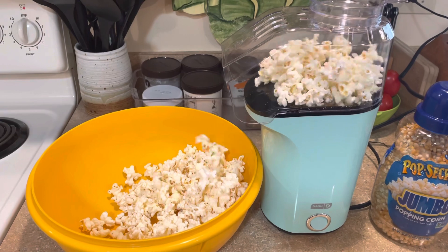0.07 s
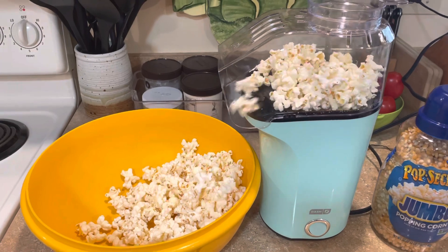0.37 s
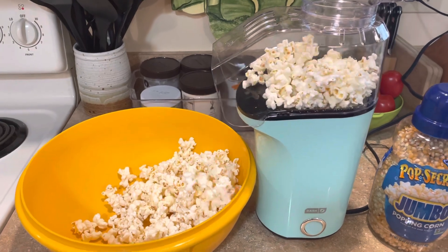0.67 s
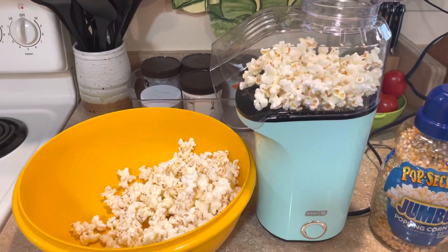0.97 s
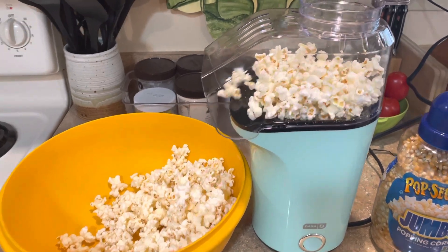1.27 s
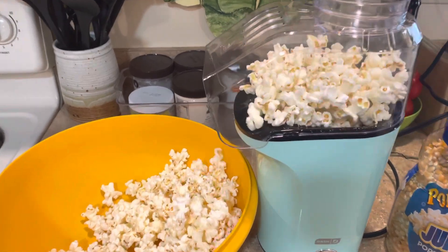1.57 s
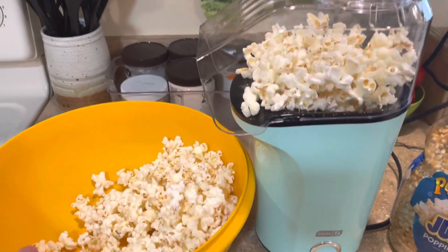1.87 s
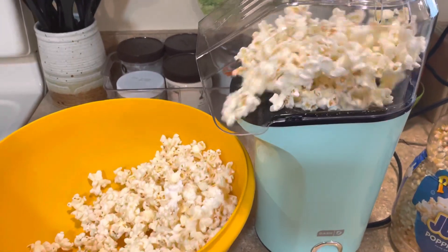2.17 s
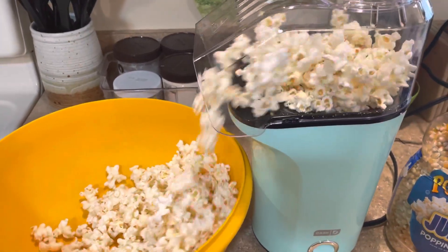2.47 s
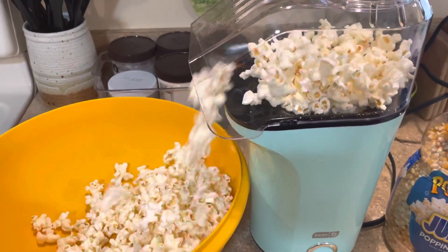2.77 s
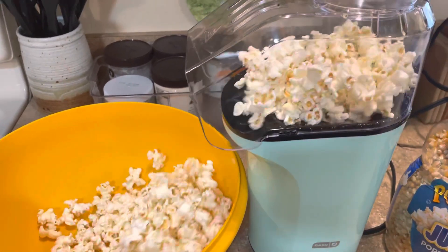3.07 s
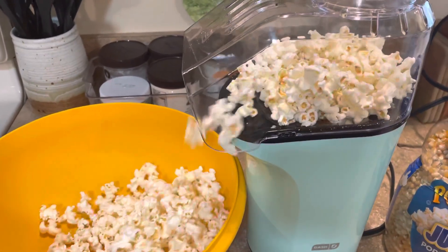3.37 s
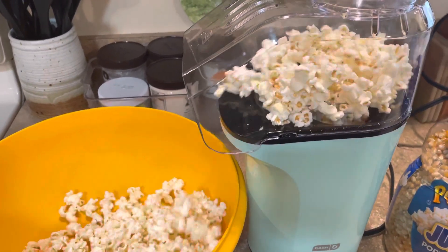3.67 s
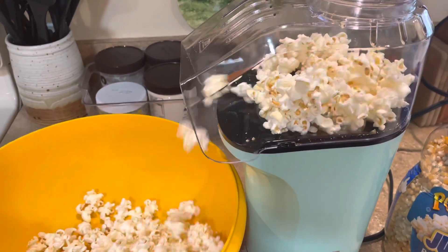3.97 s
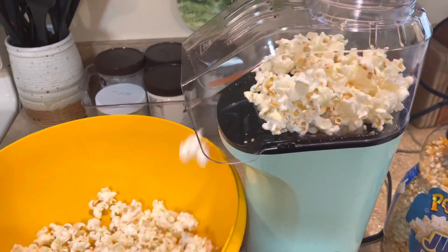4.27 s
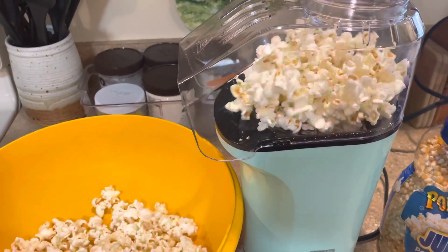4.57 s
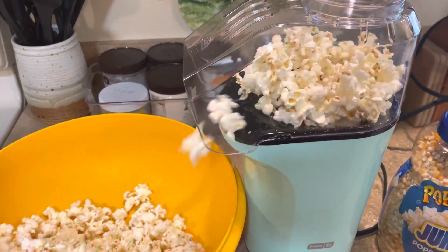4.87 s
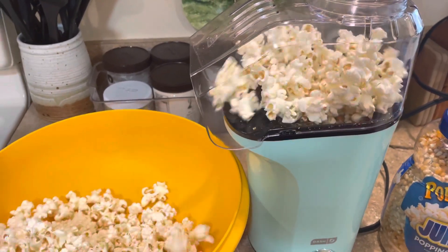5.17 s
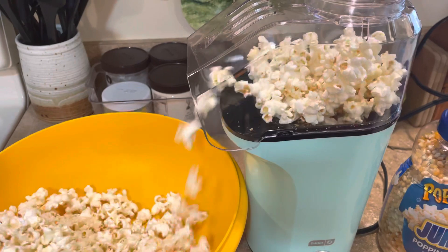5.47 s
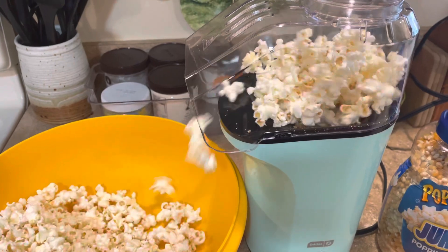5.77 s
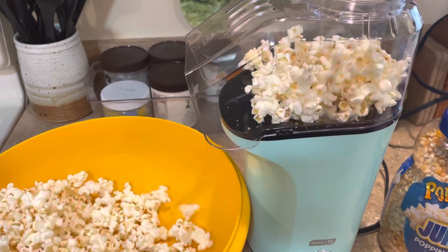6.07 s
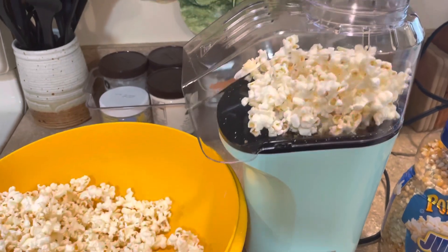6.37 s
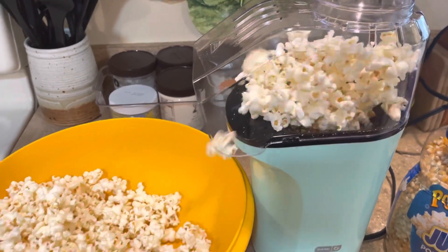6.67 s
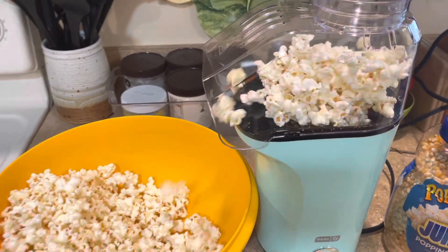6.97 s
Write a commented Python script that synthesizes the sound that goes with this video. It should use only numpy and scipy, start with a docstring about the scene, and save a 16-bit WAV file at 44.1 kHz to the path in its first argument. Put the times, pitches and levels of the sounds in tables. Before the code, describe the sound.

A hot-air popcorn maker runs close to the microphone for seven seconds, with a short kitchen echo. Its blower makes a steady, hollow rush and hiss, a low wavering hum and a faint whine, while loose kernels tick around inside. A faint whistle fades within the first half second. Popcorn bursts throughout in irregular volleys, each pop a hollow thump with a crisp crack and a brief plastic ring. Pops come thickly until 1.5 seconds, cluster again from 1.9 to 2.3, then resume at 2.7, with bright pings off the hood near 2.9 and 3.6 seconds. Dry flakes rustle softly, most around 3.4 seconds. The strongest pops fall between 3.8 and 5 seconds. Popping then thins, with a lull around 6 seconds, before another volley near 6.5 and a last pop at 7 seconds, the fan still running.

```python
"""Popcorn bursts in quick, uneven volleys over the hum and rush of a hot-air popper.
It stands on a kitchen counter, close to a pair of small microphones. The fan drives air through
the chamber, where kernels rattle under a plastic hood. Each kernel goes with a thump of steam and
a crack of the hull that sets the hood ringing; bits of the flake ping against the plastic a moment
later. Behind it all, the short echo of the kitchen."""
import sys
import numpy as np
from scipy import signal
from scipy.fft import rfft, irfft, next_fast_len
from scipy.io import wavfile
from scipy.ndimage import uniform_filter1d, minimum_filter1d

SR = 44100
rng = np.random.default_rng(int(sys.argv[2]) if len(sys.argv) > 2 else 0)


def persist_wave(psi):
    """Save psi, clipped to +-1, as 16-bit WAV."""
    counts = np.round(np.clip(psi, -1, 1) * 32767).astype(np.int16)
    wavfile.write(sys.argv[1], SR, np.atleast_2d(counts).T)


N = 309141
SIZE = next_fast_len(N + SR // 2, True)
HZ, T = np.fft.rfftfreq(SIZE, 1 / SR), np.arange(N) / SR

# bursting kernels: (time [s], steam thump [dB], hull crack [dB], hood ring [dB], hull pitch [Hz])
BURSTS = [(0.013, -7, -24.5, -26, 3500), (0.0525, -1, -28, -24, 4460), (0.145, -1, -13, -30, 9100),
          (0.2566, -6, -14.5, -23, 9050), (0.4084, -6.5, -26, -23.5, 6100),
          (0.431, -7, -17.5, -23.5, 10000), (0.4916, -1.5, -15.5, -21.5, 6840),
          (0.588, 0, -13.5, -26, 6160), (0.599, -0.5, -18, -35, 6850), (0.6116, 0, -24, -25, 5600),
          (0.7191, -3, -17, -18.5, 4400), (0.742, -4, -20.5, -21, 5360), (0.819, -5.5, -16, -27, 3560),
          (0.8364, -6, -28, -25, 2900), (0.9071, -3.5, -19, -19, 7100), (0.936, -7.5, -30, -32, 2830),
          (0.998, -5, -19.5, -23, 5460), (1.0641, -11, -32, -27.5, 3100), (1.2153, -10, -22, -20, 5540),
          (1.3037, -4, -15.5, -16, 5600), (1.4637, -2, -14, -24, 5400), (1.8643, 0, -17.5, -23.5, 4660),
          (1.9268, -1, -17, -24, 5000), (2.0243, -2, -20, -20.5, 4650), (2.1013, -3, -17.5, -19, 6150),
          (2.1541, -8, -22, -21.5, 4800), (2.2101, -5, -11.5, -22, 4650), (2.2617, -4, -26, -21, 9000),
          (2.27, 0, -18, -19.5, 6600), (2.324, -5, -38, -28, 4000), (2.7251, -1.5, -11, -18.5, 9660),
          (2.879, -3, -13.5, -17, 7300), (3.0467, -3.5, -16, -29, 7400), (3.1, -2, -14, -19.5, 6500),
          (3.2262, -4.5, -18.5, -16.5, 5230), (3.451, -2, -21, -16.5, 7900), (3.609, -3, -8.5, -17.5, 4360),
          (3.7542, -1, -16, -20, 7950), (3.822, 3.5, -20, -19, 6600), (3.986, -2, -9.5, -23, 8300),
          (4.0899, -2, -27, -24.5, 8500), (4.2405, 1.5, -18, -16, 4100), (4.2444, 3.5, -10.5, -29, 4200),
          (4.299, -2, -12, -13.5, 5800), (4.416, 3.5, -11, -17, 4200), (4.4363, -5.5, -15.5, -37.5, 7300),
          (4.4994, -5, -13.5, -31, 5540), (4.6619, -2, -19.5, -24, 8100), (4.8821, -4, -13, -22, 4440),
          (4.959, -3, -14, -23.5, 8300), (4.99, 3, -10, -24, 3460), (4.9931, -2, -16.5, -18, 5600),
          (5.276, -3, -20.5, -24, 7300), (5.5333, -3.5, -24, -27.5, 3040), (5.6655, -5, -15, -18, 5900),
          (5.6822, -3.5, -14.5, -22, 7900), (6.1585, 0, -15, -22.5, 10000), (6.38, -2, -23.5, -39, 7100),
          (6.4766, -0.5, -12, -41, 9400), (6.508, 4, -13, -20, 6850), (6.5586, -2.5, -13.5, -25, 7100),
          (6.6046, -6.5, -21, -37, 7200), (6.977, 0, -15, -27, 9300)]
# resonances of the hood and hollows between them: (centre [Hz], width [Hz], lift [dB])
HOOD_MODES = [(1620, 210, 8.5), (1750, 76, -8), (2054, 397, 11), (2520, 88, -3.5), (2742, 75, 8.5),
              (2905, 54, 6), (3460, 160, 3.5), (3586, 164, 5), (4300, 370, 3)]
# loudness of the rush and hiss as heard: (time [s], level [dB])
RUSH_LEVEL = [(0.0, -20), (0.3, -25), (1.05, -25), (1.7, -24.5), (2.0, -24), (2.6, -24), (3.45, -24.5),
              (4.6, -26), (6.35, -24.5), (6.67, -27), (6.85, -22.5), (7.01, -26)]


def amp(db):
    return 10 ** (np.asarray(db) / 20)


def unit(x):
    return x / np.sqrt(np.mean(x ** 2) + 1e-20)


def over_hz(rows, hz=HZ):
    """A table read on a logarithmic frequency axis."""
    row_hz, value = np.transpose(rows)
    return np.interp(np.log(hz + 1), np.log(row_hz), value)


def over_time(rows):
    return np.interp(T, *np.transpose(rows))


def add(mix, s, sound):
    part = mix[..., max(round(s * SR), 0):][..., :sound.shape[-1]]
    part += sound[..., :part.shape[-1]]


def bell(hz, centre_hz, width_hz):
    """The shape of one resonance: 1 at its centre."""
    return 1 / (1 + (2 * (hz - centre_hz) / width_hz) ** 2)


def causal(db):
    """A unit-energy response of this shape that rings only after it is struck."""
    log_gain = np.log(amp(db))
    phase = -signal.hilbert(np.r_[log_gain, log_gain[-2:0:-1]]).imag[:len(db)]
    return unit(amp(db)) * np.exp(1j * phase)


def filtered(x, response):
    return irfft(rfft(x, SIZE) * response, SIZE)[..., :N]


def drift(rate_hz):
    """A slow random wander of unit size."""
    return unit(filtered(rng.standard_normal(SIZE), np.exp(-(HZ / rate_hz) ** 2)))


def grit(db):
    """Two short unrelated noises with this spectrum."""
    return unit(irfft(rfft(rng.standard_normal((2, 2 * (len(db) - 1)))) * amp(db)))


def stereo(x, response):
    """Colours two unrelated signals and blends them into partly alike left and right."""
    # how alike left and right sound: (frequency [Hz], likeness [0-1])
    likeness = [(150, .93), (500, .82), (1000, .72), (2500, .72), (5000, .67), (8000, .93), (11000, .88),
                (14500, .97)]
    a, b = rfft(x, SIZE) * response
    same = np.clip(over_hz(likeness), 0, 1)
    common, apart = a * np.sqrt((1 + same) / 2), b * np.sqrt((1 - same) / 2)
    return irfft([common + apart, common - apart], SIZE)[:, :N]


def through_hood(spectrum):
    """A spectrum as heard through the resonances of the plastic hood."""
    return causal(over_hz(spectrum) + sum(db * bell(HZ, hz, width) for hz, width, db in HOOD_MODES))


def hum_level(rise_s=0.09, waver_db=2.0, waver_hz=7.0, sink_db=8, sink_s=0.065, sink_cap_db=2.5):
    """The hum fades in, wavers, and sinks briefly after each burst, more after a strong one."""
    # level of the hum as heard, switching between louder and softer: (time [s], level [dB])
    heard = [(0.0, -32), (0.25, -28), (0.5, -28.5), (0.7, -36.5), (1.0, -32), (1.25, -29.5), (1.72, -30),
             (1.82, -36), (1.93, -27.5), (2.3, -34), (2.38, -32), (2.52, -37.5), (2.6, -28.5), (2.9, -31),
             (3.0, -35), (3.15, -29), (3.6, -31.5), (3.8, -34), (4.0, -30), (4.2, -36.5), (4.4, -29),
             (4.55, -35), (4.82, -29.5), (5.08, -36.5), (5.22, -27.5), (5.43, -38), (5.6, -27.5),
             (5.72, -34), (5.9, -37), (6.02, -30.5), (6.2, -37.5), (6.6, -37), (6.8, -25), (6.93, -31),
             (7.01, -34)]
    sunk = np.zeros(N)
    age = np.arange(SR) / SR / sink_s
    for s, thump_db, *_ in BURSTS:
        add(sunk, s, sink_db * amp(thump_db) * age * np.exp(1 - age))
    waver = waver_db * np.tanh(2 * drift(waver_hz))
    fade_in = 1 - np.exp(-(T / rise_s) ** 2)
    return amp(over_time(heard) + waver - np.minimum(sunk, sink_cap_db)) * fade_in


def motor(fan_hz=252.5, waver=0.00092, flutter_db=2.0):
    """The blade hum and weaker tones share one slightly unsteady speed."""
    # whine of the motor: (pitch [Hz], level [dB])
    tones = [(507.6, -54), (689, -41.5), (1269, -50.5), (1523, -53), (3808, -52.5)]
    clock = 2 * np.pi * np.cumsum(1 + waver * drift(3.6)) / SR
    hum = hum_level() * np.sin(fan_hz * clock)
    whine = sum(amp(db + flutter_db * drift(9.0)) * np.sin(hz * clock + 0.46 * drift(11.0))
                for hz, db in tones)
    return np.sqrt(2) * (hum + whine)


def whistle(pitch_hz=970, level_db=-34, fade_s=0.38, waver=0.0036):
    """A faint, unsteady whistle dies away at the start."""
    clock = 2 * np.pi * np.cumsum(1 + waver * drift(22)) / SR
    return amp(level_db) * np.exp(-(T / fade_s) ** 4) * np.sin(pitch_hz * clock)


def air_rush(gust_db=0.85):
    """Turbulent air sounds the broad resonance of the popping chamber."""
    # spectrum of the rush: (frequency [Hz], level [dB])
    chamber = [(20, -62), (45, -33), (100, -24), (200, -21), (320, -10.5), (410, -15.5), (490, -6),
               (690, -0.5), (860, -5.5), (1230, -10.5), (1320, -28), (1400, -18.5), (2000, -26.5),
               (6000, -70)]
    turbulence = rng.standard_normal((2, N)) * amp(over_time(RUSH_LEVEL) + gust_db * drift(21))
    return stereo(turbulence, causal(over_hz(chamber)))


def swirl(hiss_db=-9.0, rattle_db=-13.5, ticks_per_s=380, spread_db=11.0, flurry_db=3, flurry_hz=12):
    """Air hisses through the vents while loose kernels tick around the chamber in flurries."""
    # spectrum of hiss and rattle: (frequency [Hz], level [dB])
    hiss = [(300, -19), (1000, -1.5), (1500, 1.5), (1800, -6.5), (3000, 2.5), (4200, -2), (5500, -1.5),
            (8000, -11), (11000, -11.5), (13300, -17), (15000, -28)]
    sizes = amp(spread_db * np.minimum(rng.exponential(1, N), 4))
    hits = rng.random(N) < ticks_per_s / SR * amp(flurry_db * drift(flurry_hz))
    tick_power = signal.lfilter([1], [1, -np.exp(-1 / (0.014 * SR))], (sizes * hits) ** 2)
    level = np.sqrt(amp(hiss_db) ** 2 + amp(rattle_db) ** 2 * tick_power / tick_power.mean())
    return stereo(rng.standard_normal((2, N)) * level * amp(over_time(RUSH_LEVEL)), through_hood(hiss))


def rustle(ticks_per_s=420, low_hz=2400, high_hz=4700, tick_s=0.0025, spread_db=1.5, count=24):
    """Dry flakes tick against each other and the hood, each with its own pitch and side."""
    # rustle of the tumbling heap: (time [s], level [dB])
    tumble = [(0.0, -45), (1.7, -65), (2.45, -48), (2.7, -50), (3.4, -40.5), (4.7, -49), (5.5, -47),
              (5.95, -43.5), (6.35, -47), (6.67, -47), (6.85, -45), (7.01, -46)]
    t, out = np.arange(SR // 50) / SR, np.zeros((2, N))
    for hz in np.geomspace(low_hz, high_hz, count):
        sizes = amp(spread_db * np.minimum(rng.exponential(1, N), 3))
        hits = rng.random(N) < ticks_per_s / count / SR
        side = rng.random()
        tick = np.exp(-t / tick_s) * np.sin(2 * np.pi * hz * t)
        out += np.sqrt([[1 - side], [side]]) * signal.oaconvolve(sizes * hits, tick)[:N]
    return amp(over_time(tumble)) * unit(out)


def steam_thumps(gain_db=0.2, cavities_hz=(170, 345), size_spread=0.036, bass_hz=230, knock_hz=880,
                 swing_db=3, even_ring_db=-18.5, knee_db=7, echo_db=-14, echo_s=0.00187):
    """Each puff of steam leaves through chamber and hood, which hold back the bass: a falling chirp."""
    # spectrum of the puff: (frequency [Hz], level [dB])
    steam = [(25, -103), (45, -21.5), (80, -11.5), (150, -4), (185, -7), (210, -15.5), (320, -1.5),
             (410, -10), (480, -1.5), (585, -1), (830, -6), (1230, -8.5), (1330, -25.5), (3000, -46),
             (8000, -99)]
    response = causal(over_hz(steam))
    for hz in cavities_hz:
        cavity = 1 - (HZ / hz) ** 2 + 1j * HZ / hz
        response = response * cavity.conj() / cavity
    bass_band, knock_band = np.exp(-(HZ / bass_hz) ** 4), bell(HZ, knock_hz, width_hz=650)
    puff, bass, knock = irfft([response, response * bass_band, response * knock_band], SIZE)[:, :SR // 10]
    steps, out = np.arange(len(puff)), np.zeros(N)
    for (s, thump_db, _, hood_db, _), chance in zip(BURSTS, rng.standard_normal(len(BURSTS))):
        # bursts that shake the hood are deeper, the rest a hollow knock
        deep_db = swing_db * np.tanh((hood_db - thump_db - even_ring_db) / knee_db)
        burst = puff + (amp(deep_db - 0.04) - 1) * bass + (amp(-deep_db - 0.5) - 1) * knock
        sized = np.interp(steps * (1 + size_spread * chance), steps, burst)  # small kernels burst faster
        add(out, s, amp(thump_db + gain_db) * sized / abs(puff).max())
    echo = amp(echo_db) * filtered(out, np.exp(-2j * np.pi * HZ * echo_s))  # off the counter, to one side
    return np.array([out - echo, out + echo])


def hull_cracks(crack_db=-1.87, snap_db=6, snap_s=0.0003, tear_s=0.0074, ragged_db=0.5, pitch_db=9,
                shrill_db=2, ring_db=2.5, ring_t60=0.1, ring_rise_s=0.0027, even_ring_db=-18.5,
                brightening=0.18):
    """The hull snaps, then tears in jerks at its own pitch. The hood rings on, also when knocked."""
    # spectrum of the cracking hull: (frequency [Hz], level [dB])
    crack = [(100, -45), (500, 5.5), (1150, 3.5), (1330, -10.5), (1700, -15), (2200, -2.5), (4200, 1),
             (5500, 3.5), (8000, -1.5), (10500, -6.5), (13000, -10.5), (16000, -20)]
    # spectrum of the ringing hood: (frequency [Hz], level [dB])
    ring = [(100, -26), (500, 11), (1100, 0.5), (1400, 7.5), (1800, -3), (3000, 5.5), (4500, 1.5),
            (6000, -2), (8000, -17), (11000, -17.5), (13300, -27), (15500, -38)]
    # loose flakes knocking on the hood: (time [s], level [dB])
    knocks = [(2.428, -23.5), (2.46, -29), (5.1154, -24), (5.8756, -27)]
    t = np.arange(SR // 6) / SR
    hz = np.fft.rfftfreq(len(t), 1 / SR)
    octaves = np.log2(np.clip(hz, 2000, 9000) / 4500)
    tear = np.exp(-(t / tear_s) ** 2)
    snap = amp(snap_db) * t / snap_s * np.exp(1 - t / snap_s)
    fade = amp(-60 * t / ring_t60) * (1 - np.exp(-t / ring_rise_s))
    hull, hood = np.zeros((2, 2, N))
    for s, _, hull_db, hood_db, pitch in BURSTS:
        hull_tilt = shrill_db * np.log2(pitch / 6000) * octaves
        torn = grit(hull_tilt + pitch_db * bell(hz, pitch, width_hz=500))
        jerks = tear * amp(ragged_db * unit(uniform_filter1d(rng.standard_normal(len(t)), size=30)))
        add(hull, s, amp(hull_db + crack_db) * unit(torn * np.hypot(snap, jerks)) * tear.std())
        hood_tilt = brightening * (hood_db - even_ring_db) * octaves  # struck harder, it rings brighter
        add(hood, s, amp(hood_db + ring_db) * grit(hood_tilt) * fade)
    for s, db in knocks:
        add(hood, s, amp(db - 60 * t / 0.04) * rng.standard_normal((2, len(t))))
    return stereo(hull, through_hood(crack)) + stereo(hood, through_hood(ring))


def ricochets(gain_db=2.5, first_s=0.004, last_s=0.044, detune=0.027, count=2):
    """Bits thrown by a burst hit the hood a moment later, each pinging one of its upper resonances."""
    t, out = np.arange(SR // 20) / SR, np.zeros((2, N))
    upper = HOOD_MODES[-5:]
    for (s, _, _, hood_db, _), bits in zip(BURSTS, rng.random((len(BURSTS), count, 4))):
        for flight, spot, mistune, side in bits:
            hz, width, _ = upper[int(spot * len(upper))]
            ping = np.exp(-np.pi * width * t) * np.sin(2 * np.pi * hz * (1 + detune * (mistune - .5)) * t)
            gains = amp(hood_db + gain_db) * (1 - flight / 2) * np.sqrt([[1 - side], [side]])
            add(out, s + first_s + flight * (last_s - first_s), gains * ping)
    return out


def pings(gain_db=-1.0, swell_s=0.0037, chatter=0.4, chatter_s=0.0012):
    """A hard bit chatters against one spot of the hood, whose ring swells unevenly and soon dies."""
    # bits striking the hood: (time [s], pitch [Hz], level [dB])
    strikes = [(0.724, 4390, -21), (0.909, 2630, -29), (1.303, 2570, -21), (1.327, 2970, -31),
               (2.231, 2900, -17.5), (2.509, 2885, -25), (2.726, 3500, -26), (2.887, 3690, -11),
               (2.911, 3640, -20), (3.128, 3560, -20.5), (3.238, 2760, -15), (3.6107, 4350, -12),
               (3.833, 3060, -20), (3.838, 2770, -24), (4.5005, 3540, -19), (5.004, 2950, -16.5),
               (5.683, 2980, -22)]
    t, out = np.arange(SR // 16) / SR, np.zeros(N)
    shape = t / swell_s * np.exp(1 - t / swell_s)
    for (s, hz, db), taps in zip(strikes, rng.standard_normal((len(strikes), len(t)))):
        tone = np.sin(2 * np.pi * hz * t)
        buzz = unit(signal.fftconvolve(taps, np.exp(-t / chatter_s) * tone)[:len(t)])
        add(out, s, amp(db + gain_db) * shape * ((1 - chatter) * tone + chatter * buzz))
    return out


def kitchen(x, first_s=0.0065):
    """Sparse echoes from counter, wall and cupboards, each band dying at its own speed."""
    # decay of the room: (frequency [Hz], time to fall 60 dB [s])
    decay = [(100, 0.31), (500, 0.28), (3000, 0.37), (8000, 0.33), (15000, 0.16)]
    taps = rng.standard_normal((2, SR // 2)) * (rng.random((2, SR // 2)) < .08)
    taps[:, :int(first_s * SR)] = 0
    hz, t, bands = signal.stft(taps, SR, nperseg=256)
    tail = signal.istft(bands * amp(-60 * t / over_hz(decay, hz)[:, None]), SR, nperseg=256)[1]
    return stereo(filtered(x, rfft(tail / np.linalg.norm(tail[0]), SIZE)), 0.87)


def held_down(level_db, limit_db, recovery_db_per_s):
    """Gain in dB that falls at once by any excess over the limit and recovers steadily."""
    recovery = recovery_db_per_s * T
    gain_db = recovery - np.maximum.accumulate(np.maximum(level_db - limit_db, 0) + recovery)
    return uniform_filter1d(minimum_filter1d(gain_db, size=41), size=41)


def scene(blower_db=-2.3, steam_room_db=-12, hull_room_db=-9.0, bits_room_db=-18, blower_room_db=-15):
    """The popper from close by: steam, hulls, blower and bits, each with its share of the kitchen."""
    steam = steam_thumps()
    hulls = hull_cracks() + rustle()
    blower = amp(blower_db) * (air_rush() + swirl())
    bits = ricochets() + pings()
    to_room = (amp(steam_room_db) * steam + amp(hull_room_db) * hulls
               + amp(bits_room_db) * bits + amp(blower_room_db) * blower)
    return motor() + whistle() + blower + steam + hulls + bits + kitchen(to_room.mean(0))


def record(dry, average_s=0.08, duck_share=0.28, top_hz=16300):
    """Two small microphones; gain control ducks after volleys, a limiter holds peaks, the top is cut."""
    # balance of the pair: (frequency [Hz], left minus right [dB])
    balance = [(50, 1), (300, -3.5), (550, -3), (1000, 0), (1600, -1.5), (2400, 2), (3500, 2.5),
               (6000, -0.5), (15000, -2)]
    # phase between the pair: (frequency [Hz], lag of the left [rad])
    lag = [(100, 0), (3300, -.25), (4000, .35), (5200, -.45), (6200, .6), (8100, 3.05), (9500, 4.2),
           (10600, 6), (12000, 6.4), (13000, 7.2), (14000, 9.3), (16000, 9.4)]
    half = amp(over_hz(balance) / 2)
    x = filtered(dry, np.array([half * np.exp(-1j * over_hz(lag)), 1 / half]))
    step = 1 / (average_s * SR)
    power = signal.lfilter([step], [1, step - 1], (x ** 2).mean(0))
    full_duck_db = held_down(10 * np.log10(power + 1e-12), limit_db=-18.0, recovery_db_per_s=6.0)
    x = x * amp(duck_share * full_duck_db)
    peak_db = 20 * np.log10(abs(x).max(0) + 1e-9)
    x = x * amp(held_down(peak_db, limit_db=-1, recovery_db_per_s=700))
    lowpass = signal.firwin(401, top_hz, window=("kaiser", 9), fs=SR)
    return signal.oaconvolve(x, lowpass[None], "same")


dry = scene()
out = record(dry)
persist_wave(out)
```